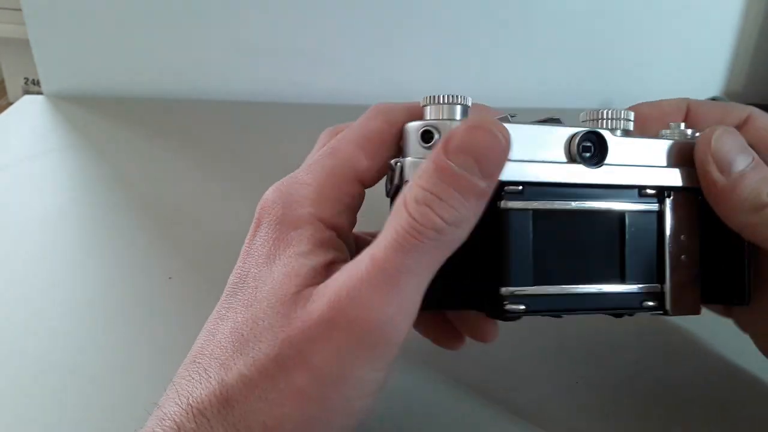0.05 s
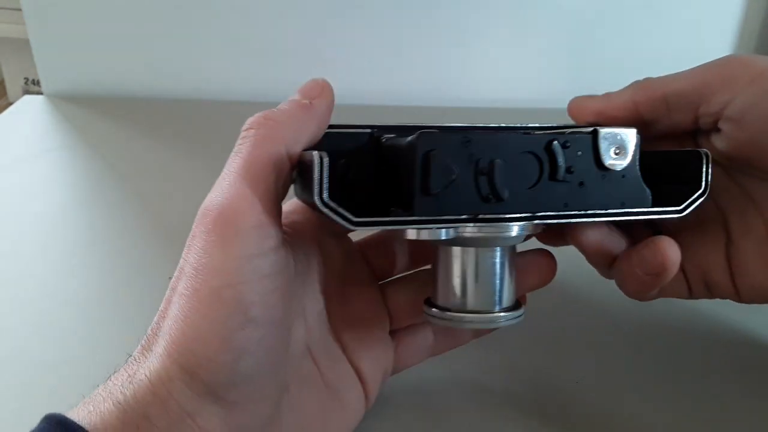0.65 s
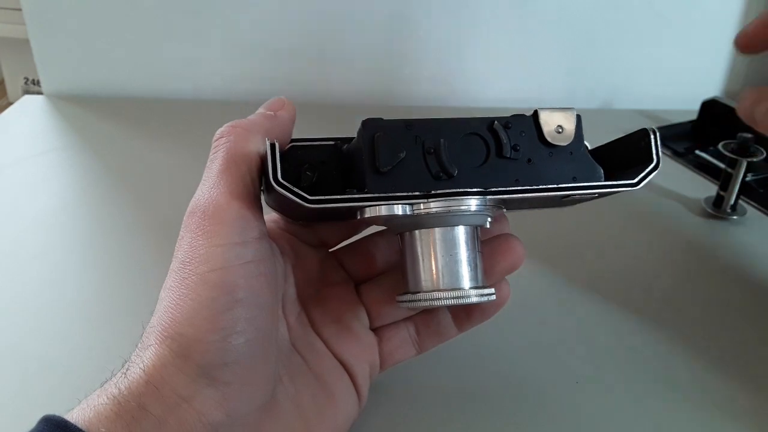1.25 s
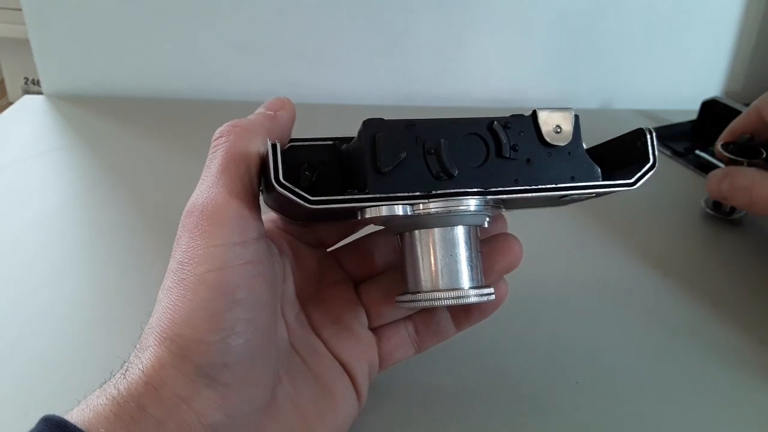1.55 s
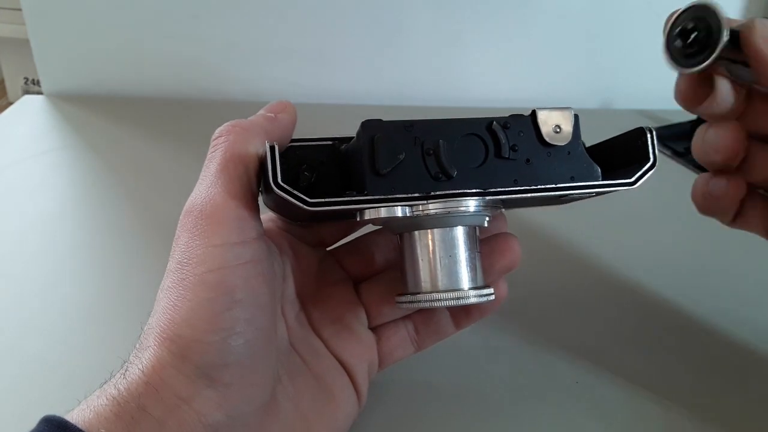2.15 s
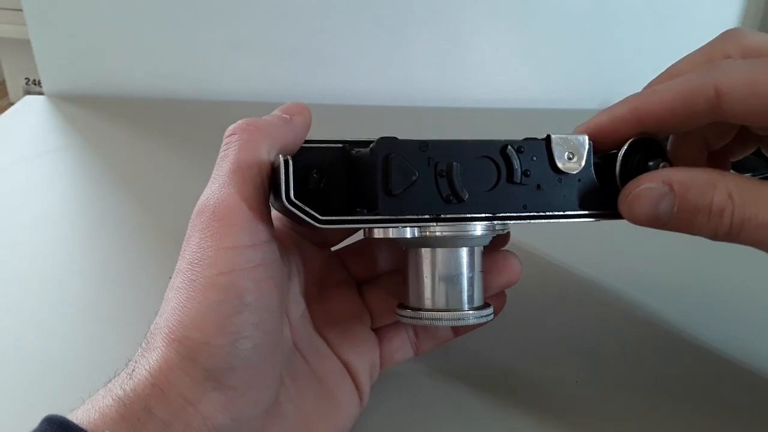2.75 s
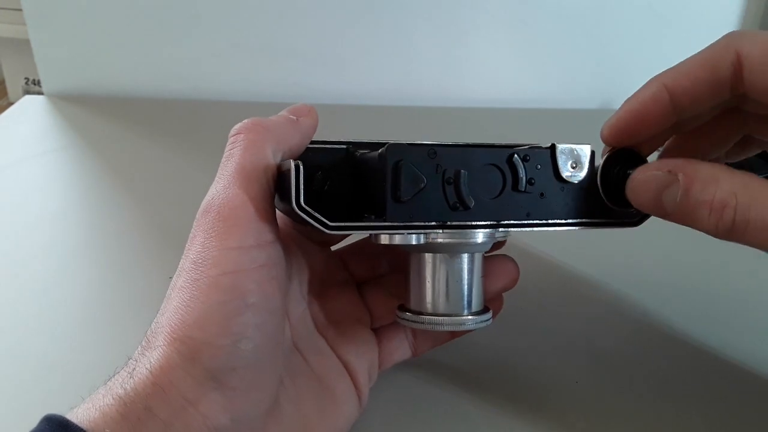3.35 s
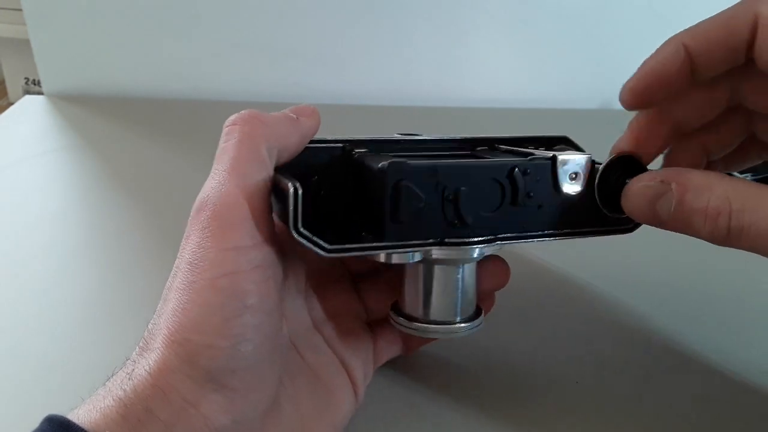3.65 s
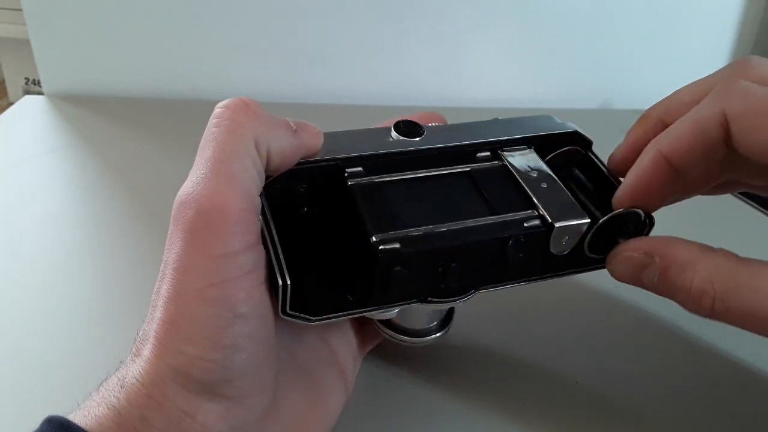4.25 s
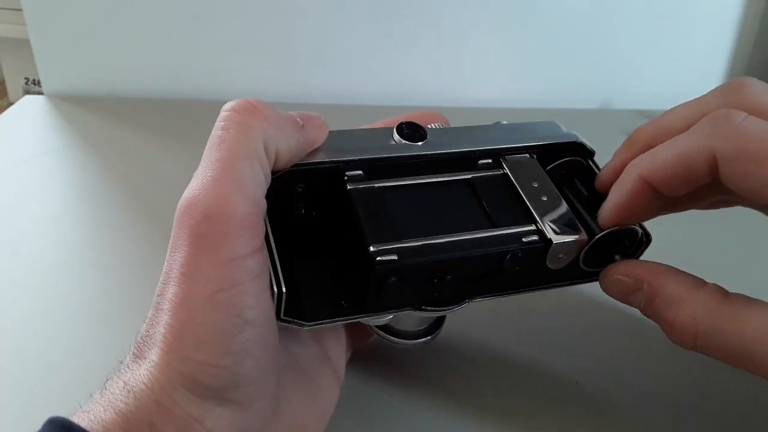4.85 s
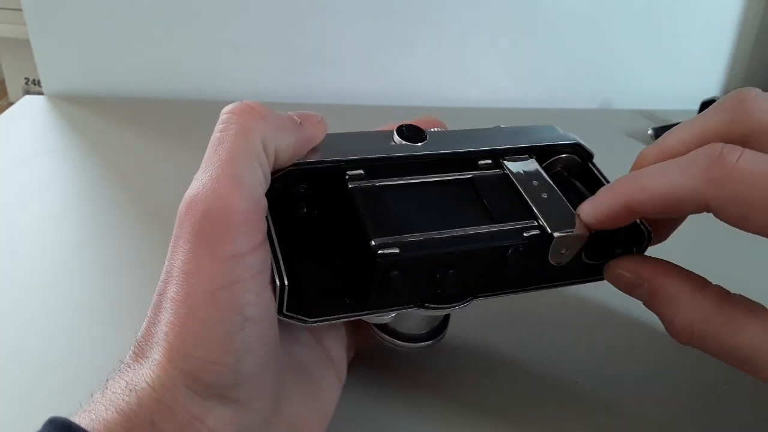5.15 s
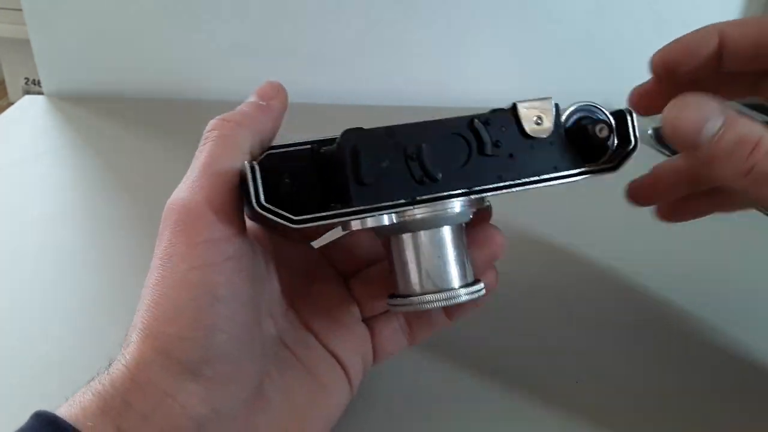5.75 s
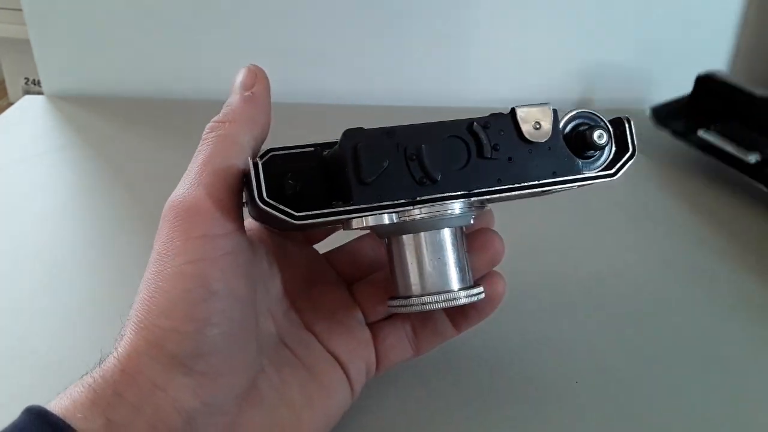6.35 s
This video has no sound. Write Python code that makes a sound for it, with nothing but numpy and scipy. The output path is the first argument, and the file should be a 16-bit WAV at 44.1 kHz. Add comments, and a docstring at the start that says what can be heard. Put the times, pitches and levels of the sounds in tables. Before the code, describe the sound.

Close to the microphone in a small, slightly echoing room, an open metal camera is handled with quiet skin rubs, fingertip ticks and a few soft table bumps. Bright clinks follow as a spool knocks into its chamber, then scattered light ticks and a cluster of clacks as it seats. Finally the loose metal back rocks on the table with a hollow rattle and thin pings. A faint machine hum lies underneath.

```python
"""A small live room, close to a table, one microphone. An open metal camera is turned over in the hands:
fingers slide and catch on the casing, and hands bump the table top. A film spool clinks into the chamber,
then ticks and clacks against the hollow body, once flicking its spring. At the end the loose camera back
clatters on the table and a small metal part pings. Each blow is a crack plus ringing modes, answered by
the room. Underneath lie a faint machine hum, the room's air and the microphone's narrow hiss."""
import sys
import numpy as np
from scipy import signal
from scipy.fft import rfft, irfft
from scipy.io import wavfile
from scipy.ndimage import uniform_filter1d

SR = 44100
rng = np.random.default_rng(int(sys.argv[2]) if len(sys.argv) > 2 else 0)


def materialize(psi):
    """Save the field psi as 16-bit PCM at rate SR to the path in sys.argv[1].

    A 1-D psi becomes a single channel; in a 2-D psi each row is a channel.
    """
    bounded = np.clip(np.atleast_2d(psi).T, -1, 1)
    quanta = np.round(bounded * 32767).astype(np.int16)
    wavfile.write(sys.argv[1], SR, quanta)


N = 286650
TIME = np.arange(N) / SR
LEAD_S = .01  # quiet run-in before each contact
METAL_RISE_S = .0005  # build-up of a metal-on-metal contact
DULL_T60_S = .42  # how long dull blows linger in the room

# partials of the machine hum: f/Hz, level/dB
HUM_PARTIALS = [(118.4, -74), (177.6, -70), (306.8, -70), (360.7, -63.5), (538.3, -81)]
# spectra of the room's air and the microphone's hiss: f/Hz, relative level/dB
AIR_COLOUR = [(15, -54), (25, -22.5), (90, -13), (123, -11), (151, -13.5), (180, -11.5), (205, -14.5),
              (299, -10.5), (327, -12), (357, -9), (436, -18), (545, -22.5), (1060, -31.5), (1210, -33),
              (5000, -50), (6500, -111), (11000, -120)]
HISS_COLOUR = [(4000, -24), (6500, -18.5), (7500, -15.5), (8300, 0), (8900, 4.5), (9400, -6), (10000, -17),
               (11300, -21), (13000, -14), (14500, -12), (16000, -20.5)]

# strokes of skin on the casing, and at 1.63 s a brief scrape on the table: start t/s, length/s, level/dB
PALM_RUBS = [(0.065, .14, -58), (1.63, 0.027, -74)]
FINGER_SLIDES = [(0.092, .17, -67), (0.355, 0.092, -74.5), (0.53, 0.056, -64), (5.58, 0.07, -61.5)]
# their friction spectra: f/Hz, relative level/dB
PALM_COLOUR = [(200, -7), (330, -0.5), (430, 2), (700, -14), (1400, -25), (2100, -18), (3000, -38),
               (6000, -43)]
FINGER_COLOUR = [(2000, -11), (5000, -21.5), (7200, -16.5), (8300, 6.5), (9300, -4.5), (10500, -23),
                 (15000, -31)]

# blows: t/s, level/dB, brightness/dB, room send/dB
FINGERTIP_TOUCHES = [(0.3175, -64, -19, -4), (0.479, -69, -14, -10), (0.651, -49.5, 20, -5),
                     (0.862, -55, -19.5, 2), (1.1035, -52.5, 6, -1), (4.0203, -55.5, 9, 0),
                     (6.2, -64, -23, 11)]  # fingertips catch on the casing
TABLE_BUMPS = [(0.709, -42.5, 7, 3), (0.718, -41, -11, -1), (0.748, -63, 20, 2)]  # the hand holding the camera lands
TABLE_TAPS = [(1.184, -56.5, -3, -3), (1.677, -42, 4, 3)]  # the loose back is nudged on the table as the spool is lifted from it
SPOOL_CLINKS = [(2.6985, -34, -1, 1.5), (2.755, -45.5, -4, -2), (2.8114, -30.5, 11.5, -4),
                (2.8178, -24, 12.5, -5), (2.9134, -27.5, -4, -15.5), (2.9178, -27, -14.5, -2.5)]  # the bare spool knocks the chamber's rim
SPOOL_TICKS = [(2.9825, -45, -33, 2), (3.144, -56.5, -16, 5.5), (3.422, -34.0, 11, -2.5),
               (3.5418, -39, -8.5, -3.5), (3.7168, -42.5, -7, -14), (3.7235, -46.5, -9, 0.5),
               (3.812, -36.5, 11, -7), (3.8375, -48, 38, -17), (3.879, -51.5, -4, 5),
               (3.9196, -39, -2.5, -5), (4.1372, -45.0, 5.5, -2), (4.5236, -62, -6, 3),
               (4.6375, -58, -15, -3.5), (4.7508, -49.5, -13.0, -14), (4.7555, -50, -9.0, -1),
               (4.769, -49, 0, -2.5), (4.8364, -35.5, 12.5, -2.5), (4.9528, -32.5, 10.5, -5),
               (4.983, -40.5, -2, -4)]  # the held spool meets the hollow body
SPOOL_CLACKS = [(3.0613, -41.0, -18, -5.5), (3.4285, -37, -2, 0), (5.167, -41, 10, -7.0),
                (5.1716, -27.0, 17, 0.5), (5.291, -52.5, -19, 0), (5.331, -34, -18, -5.5),
                (5.3735, -35.5, -0.5, 0.5), (5.3905, -31.5, 8, -17.5), (5.6617, -34.5, -3.5, -2.5),
                (5.6895, -41.5, -8, -24)]  # it slips and seats
SPRING_ZINGS = [(3.8125, -43.5, 5, -3)]  # it flicks its retaining spring
BACK_CLATTER = [(6.2, -47, -15, 5), (6.215, -46, -17, 8), (6.258, -46.5, -1, 6), (6.282, -35.5, -12, 1),
                (6.292, -34, -5, -9), (6.303, -29.5, -1.5, -5.5), (6.313, -26.5, 8, -5.5),
                (6.325, -36, 22, 6), (6.348, -39, -10, 8.5), (6.4, -50, 29, 7)]  # the loose back rocks on the table
PART_PINGS = [(6.261, -48.5, 14, 7), (6.462, -52.5, -18, 2)]  # a small metal part is nudged

# spectrum of each kind of blow: f/Hz, relative level/dB
TOUCH_COLOUR = [(850, -20), (1660, -23), (2950, -18), (4500, -23), (6100, -20), (8400, 0), (12600, -13)]
BUMP_COLOUR = [(110, 2.5), (290, -2.5), (740, -6), (1700, -17), (4300, -24.5)]
TAP_COLOUR = [(110, -31), (290, 2.5), (740, -12.5), (1700, -28), (4300, -33)]
CLINK_COLOUR = [(850, -24.5), (1660, -16.5), (2950, -10.5), (4500, -8), (6100, -11.5), (8400, -1),
                (12600, -11)]
TICK_COLOUR = [(850, -5.5), (1660, 0.5), (2950, -13), (4500, -18.5), (6100, -15.5), (8400, -2),
               (12600, -27)]
CLACK_COLOUR = [(850, -14), (1660, -3.5), (2950, -4.5), (4500, -12.5), (6100, -6), (8400, 2), (12600, -21)]
ZING_COLOUR = [(3700, -26), (5500, -4.5), (8500, 5.5), (13300, -21)]
CLATTER_COLOUR = [(120, -17), (260, 4.5), (530, 0), (1200, -6), (3600, -21), (10200, -21)]
PING_COLOUR = [(3700, -7.5), (5500, -9), (8500, 3), (13300, -14.5)]
# spectra of a contact's brief noise and of the room's tail: f/Hz, relative level/dB
CRACK_COLOUR = [(60, -4.5), (500, 3.5), (820, -8), (1150, -2.5), (1800, -2), (4000, -5.5), (6500, -7),
                (8300, 13.5), (9300, 1), (11000, -12), (13000, -15.5), (16000, -23.5)]
ROOM_COLOUR = [(80, 1), (300, -5), (900, 2), (2000, 3), (5000, 4.5), (8300, 6), (11000, 6.5), (15000, 4)]

# ringing modes of the struck objects: f/Hz, relative level/dB, t60/s
BODY_MODES = [(817.5, -0.5, 0.041), (1590, 3.5, 0.02), (1774, 9, 0.034), (2064, -1.5, 0.022),
              (2760, -2, 0.015), (3166, -4.5, 0.028), (3420, -3, 0.016), (4330, -21.5, 0.0097),
              (4480, -15.5, 0.0068), (5040, 1, 0.011), (5420, -1.5, 0.018), (6160, -2, .018),
              (5965, -3.5, 0.019), (6440, 8, 0.01), (7120, -4.5, 0.043), (8270, -13.5, 0.023),
              (8370, 2, 0.012), (8750, 2.5, 0.012), (9800, -16.5, 0.02), (10890, -10.5, 0.014)]  # camera body and spool
TABLE_MODES = [(116, 8, 0.17), (210, 0, 0.056), (281, -2, 0.081), (375, 7, 0.043), (442, 7, 0.012),
               (543, 3, 0.027), (650, 6, 0.019), (784, 1, 0.027), (920, -8, 0.049), (1720, -29, 0.018),
               (3420, -23, 0.0033)]
FLANGE_MODES = [(2920, -5, .05), (4560, -1.5, 0.011), (5070, -10.5, 0.035), (5650, -5.5, 0.062),
                (6300, -8, .04), (15250, -23.5, .07)]  # the spool's flanges while free
SPRING_MODES = [(5520, -5, 0.096), (5800, -6, 0.053), (8200, -2, 0.13), (8500, 2, 0.14), (8900, 3, 0.095)]
BACK_MODES = [(125.6, 16, 0.17), (203, -4, 0.081), (218.7, 5.5, 0.31), (317, 14.5, 0.051),
              (442, 6.5, 0.054), (500, -29, .05), (625, -4.5, 0.06), (894, -7.5, 0.056), (1000, -1, 0.026),
              (1105, -4.5, 0.04), (1314, -7.5, 0.12), (1470, -24, 0.066), (1616, -12.5, 0.07),
              (2384, -8.5, 0.1), (8000, -10, .06), (8400, -13, .07), (8670, 6, 0.062), (9520, 3, 0.055)]
PART_MODES = [(3900, 0, 0.053), (5330, -12, 0.062), (7260, -9, .1), (7700, -10, 0.045), (8400, -17, 0.057),
              (8900, -5, 0.073), (8940, 10, 0.033), (13820, -11, .04)]

# edges of the bands in which blows are coloured: f/Hz
CLICK_BANDS = [600, 1200, 2300, 3800, 5300, 7000, 10000, 16000]
TABLE_BANDS = [90, 170, 500, 1100, 2600, 7000]
PING_BANDS = [3000, 4600, 6500, 11000, 16000]
BACK_BANDS = [80, 180, 380, 750, 2000, 6500, 16000]


def undb(db):
    """Decibels to gain."""
    return 10 ** (np.asarray(db) / 20)


def unit(x):
    """Scale to rms 1."""
    return x / np.sqrt(np.mean(x ** 2) + 1e-24)


def fade(t, t60):
    """Exponential decay, 60 dB down after t60."""
    return np.exp(-np.log(1000) * t / t60)


def noise(colour, size):
    """Noise of rms 1 with a spectrum through points of f/Hz, level/dB."""
    hz, db = np.transpose(colour)
    f = np.fft.rfftfreq(size, 1 / SR) + 1
    gain = undb(np.interp(np.log(f), np.log(hz), db))
    return unit(irfft(rfft(rng.standard_normal(size)) * gain, size))


def drift(rate_hz):
    """Smooth random drift of rms 1."""
    hold = int(SR / rate_hz)
    steps = np.repeat(rng.standard_normal(N // hold + 1), hold)
    return unit(uniform_filter1d(steps, hold)[:N])


def background(air_db=-64, hiss_db=-76):
    """A slightly wavering machine hum, the murmur of the room's air and microphone hiss."""
    hum = np.zeros(N)
    for hz, db in HUM_PARTIALS:
        amplitude = np.sqrt(2) * undb(db + 1.3 * drift(10))
        cycles = np.cumsum(hz + 1.5 * drift(7)) / SR
        hum += amplitude * np.sin(2 * np.pi * cycles)
    air = undb(air_db + drift(4)) * noise(AIR_COLOUR, N)
    return hum + air + undb(hiss_db) * noise(HISS_COLOUR, N)


def strokes(events, attack_s=.072, release_t60=.33):
    """Envelope of slides: the skin gathers speed up to each start, holds it and comes to rest."""
    envelope = np.zeros(N)
    for s, length_s, db in events:
        attack = np.clip(1 + (TIME - s) / attack_s, 0, 1)
        release = fade(np.maximum(TIME - s - length_s, 0), release_t60)
        envelope += undb(db) * attack * release
    return envelope


def sliding_skin():
    """Palm and dry fingertips slide over the casing in small jerks as the camera is turned; once something
    scrapes briefly on the table."""
    grip_db = 2.2 * drift(140)
    palm = strokes(PALM_RUBS) * undb(grip_db) * noise(PALM_COLOUR, N)
    fingers = strokes(FINGER_SLIDES) * undb(.74 * grip_db) * noise(FINGER_COLOUR, N)
    return palm + fingers


def add(track, s, sound):
    """Mix a sound into a track at time s."""
    i = int(s * SR)
    track[i:i + len(sound)] += sound[:N - i]


def band_gains(edges, colour, bright_db, corner_hz):
    """Shares of a blow's strength in each band: a harder contact lifts all above the corner."""
    centre = np.sqrt(np.multiply(edges[:-1], edges[1:]))
    hz, db = np.transpose(colour)
    shelf_db = bright_db / (1 + (corner_hz / centre) ** 2)
    gains = undb(np.interp(np.log(centre), np.log(hz), db) + shelf_db)
    return gains / np.linalg.norm(gains)


def blows(events, modes, colour, edges, *, corner_hz, crack_db, crack_t60, rise_s, length_s,
          detune, blur_hz, room_t60):
    """Each blow is a crack plus ringing modes, heard in the room; its level is rms over length_s."""
    t = np.maximum(np.arange(SR // 5) / SR - LEAD_S, 0)
    hz, db, t60 = np.transpose(modes)[:, :, None]
    bands = [signal.butter(3, pair, "bandpass", fs=SR, output="sos") for pair in zip(edges, edges[1:])]
    out = np.zeros(N)
    for s, level_db, bright_db, send_db in events:
        # the grip shifts the modes a little from blow to blow
        pitch = hz * (1 + detune * rng.standard_normal(hz.shape))
        phase = 2 * np.pi * (pitch * t + rng.random(hz.shape))
        ring = np.sum(undb(db) * fade(t, t60) * np.sin(phase), axis=0)
        crack = undb(crack_db) * noise(CRACK_COLOUR, len(t)) * fade(t, crack_t60)
        contact = (ring + crack) * (1 - np.exp(-t / rise_s))
        parts = [signal.sosfiltfilt(band, contact) for band in bands]
        gains = band_gains(edges, colour, bright_db, corner_hz)
        coloured = sum(gain * part / np.linalg.norm(part) for gain, part in zip(gains, parts))
        direct = undb(level_db) * np.sqrt(length_s * SR) * coloured
        add(out, s - LEAD_S, direct)
        add(out, s - LEAD_S, undb(send_db) * room(direct, blur_hz, room_t60))
    return out


def room(sound, blur_hz, t60, wet_db=-2, split_hz=8800, treble_t60=.39, gap_s=.0068,
         echo_s=.0117, echo_db=-14):
    """The room's answer to one blow: a first echo and a diffuse tail whose treble dies sooner."""
    t = np.arange(SR) / SR
    # the walls hear the blow from all sides, so the fine ripples of its spectrum average out
    power = uniform_filter1d(np.abs(rfft(sound, SR)) ** 2, int(blur_hz))
    diffuse = irfft(rfft(noise(ROOM_COLOUR, SR)) * np.sqrt(np.abs(power)), SR)
    low = signal.sosfiltfilt(signal.butter(2, split_hz, fs=SR, output="sos"), diffuse)
    treble = diffuse - low
    tail = (low * fade(t, t60) + treble * fade(t, treble_t60)) / np.linalg.norm(fade(t, t60))
    onset = np.clip((t - LEAD_S) / gap_s - 1, 0, 1)
    answer = undb(wet_db) * tail * onset
    add(answer, echo_s, undb(echo_db) * sound)
    return answer


def fingertips():
    """Thin, light ticks of nails and skin on the casing."""
    return blows(FINGERTIP_TOUCHES, BODY_MODES, TOUCH_COLOUR, CLICK_BANDS,
                 corner_hz=4000, crack_db=10.5, crack_t60=.02, rise_s=.00047,
                 length_s=.004, detune=.02, blur_hz=600, room_t60=.56)


def table():
    """Soft, heavy bumps of the hands and lighter nudges of the loose back die quickly in the table top."""
    bumps = blows(TABLE_BUMPS, TABLE_MODES, BUMP_COLOUR, TABLE_BANDS,
                  corner_hz=302, crack_db=-1, crack_t60=.016, rise_s=.0013,
                  length_s=.0084, detune=.0078, blur_hz=160, room_t60=DULL_T60_S)
    taps = blows(TABLE_TAPS, TABLE_MODES, TAP_COLOUR, TABLE_BANDS,
                 corner_hz=300, crack_db=-5, crack_t60=.028, rise_s=.00091,
                 length_s=.0096, detune=.018, blur_hz=160, room_t60=DULL_T60_S)
    return bumps + taps


def spool():
    """The spool clinks on its way in, then ticks and clacks in the chamber, damped by the hands."""
    clinks = blows(SPOOL_CLINKS, BODY_MODES + FLANGE_MODES, CLINK_COLOUR, CLICK_BANDS,
                   corner_hz=2000, crack_db=12.5, crack_t60=.021, rise_s=METAL_RISE_S,
                   length_s=.0036, detune=.018, blur_hz=602, room_t60=.46)
    ticks = blows(SPOOL_TICKS, BODY_MODES, TICK_COLOUR, CLICK_BANDS,
                  corner_hz=4000, crack_db=11, crack_t60=.016, rise_s=METAL_RISE_S,
                  length_s=.003, detune=.017, blur_hz=278, room_t60=.56)
    clacks = blows(SPOOL_CLACKS, BODY_MODES, CLACK_COLOUR, CLICK_BANDS,
                   corner_hz=4000, crack_db=11.5, crack_t60=.023, rise_s=METAL_RISE_S,
                   length_s=.0034, detune=.015, blur_hz=484, room_t60=.49)
    return clinks + ticks + clacks


def spring():
    """The thin leaf spring sings on after the tick that set it off."""
    return blows(SPRING_ZINGS, SPRING_MODES, ZING_COLOUR, PING_BANDS,
                 corner_hz=6500, crack_db=7, crack_t60=.022, rise_s=METAL_RISE_S,
                 length_s=.012, detune=.0028, blur_hz=200, room_t60=.5)


def camera_back():
    """The loose sheet-metal back rocks on the table with a scraping, hollow clunk."""
    return blows(BACK_CLATTER, BACK_MODES, CLATTER_COLOUR, BACK_BANDS,
                 corner_hz=500, crack_db=7, crack_t60=.063, rise_s=.0013,
                 length_s=.011, detune=.0013, blur_hz=49.6, room_t60=DULL_T60_S)


def loose_part():
    """Thin pings from a piece of metal that no hand damps."""
    return blows(PART_PINGS, PART_MODES, PING_COLOUR, PING_BANDS,
                 corner_hz=6500, crack_db=8.5, crack_t60=.036, rise_s=.0021,
                 length_s=.012, detune=.0067, blur_hz=120, room_t60=.42)


def scene():
    """All sources at one microphone."""
    contacts = spool() + spring() + fingertips() + table() + camera_back() + loose_part()
    return (contacts + sliding_skin() + background())[None]


def record(dry):
    """The recorder cuts the top steeply above 15.8 kHz."""
    return signal.sosfilt(signal.ellip(8, .2, 70, 15800, fs=SR, output="sos"), dry)


dry = scene()
out = record(dry)
materialize(out)
```